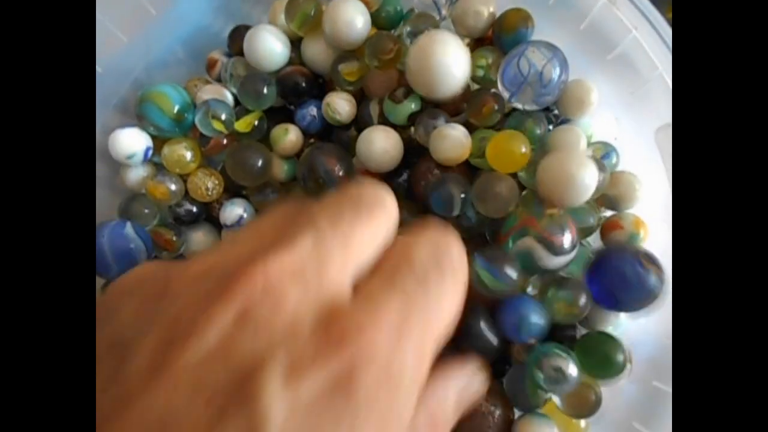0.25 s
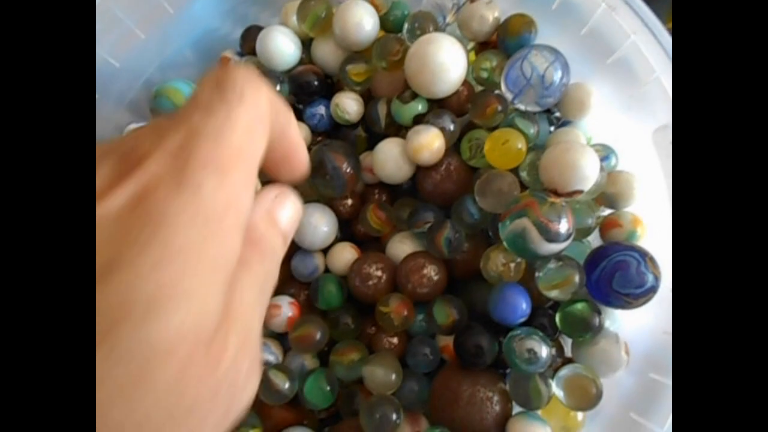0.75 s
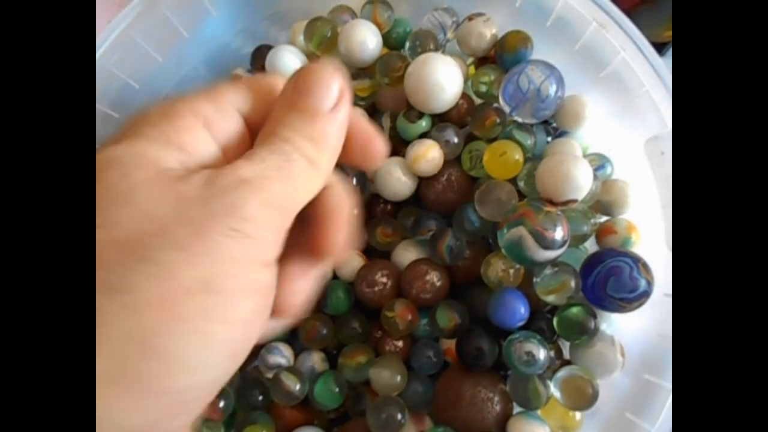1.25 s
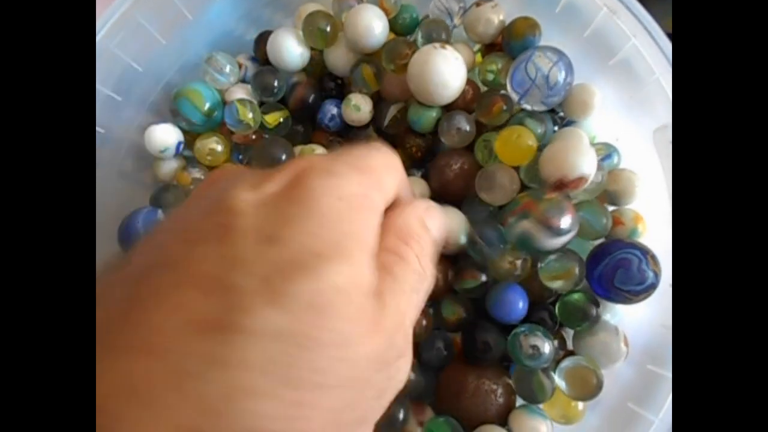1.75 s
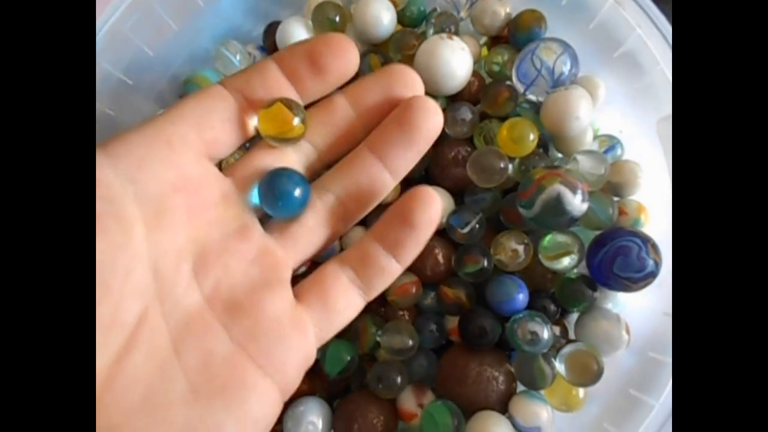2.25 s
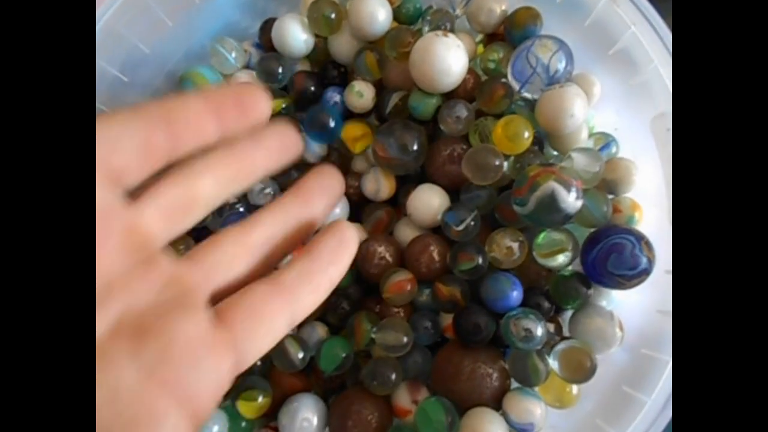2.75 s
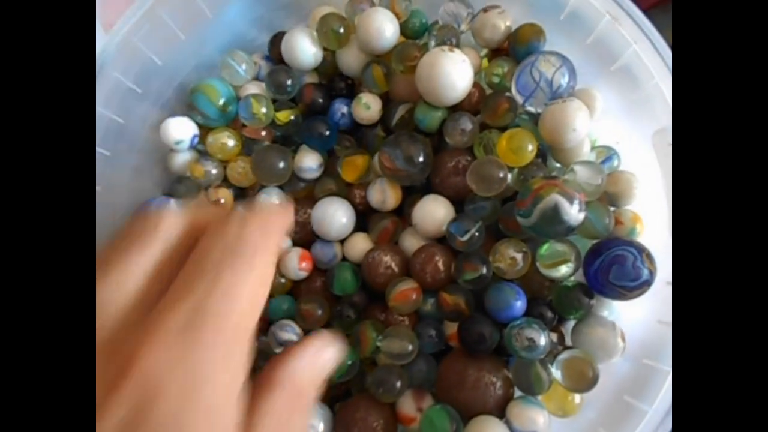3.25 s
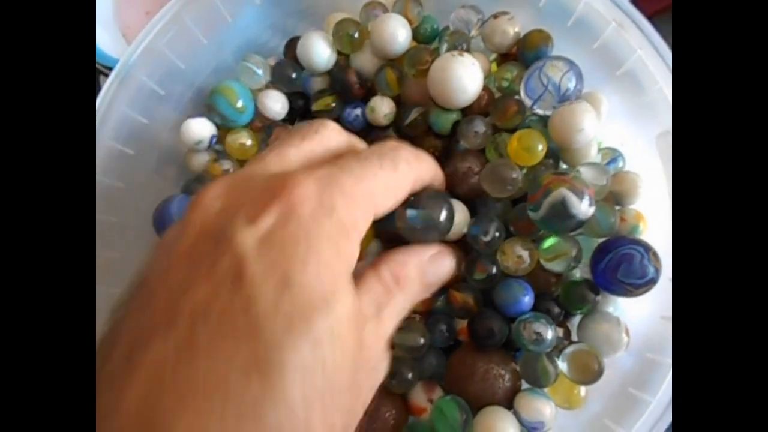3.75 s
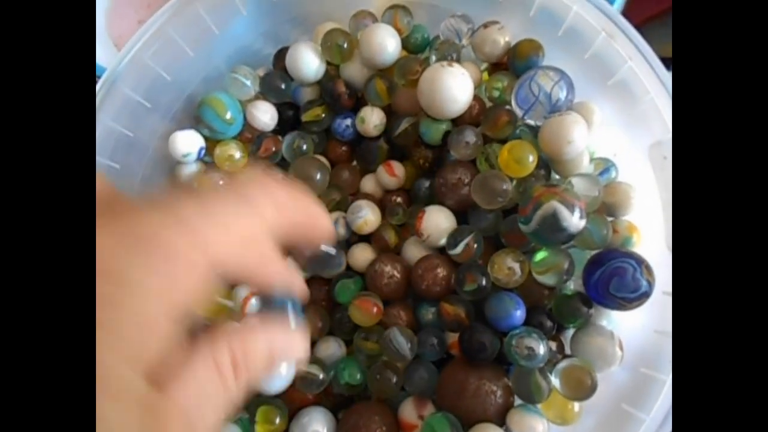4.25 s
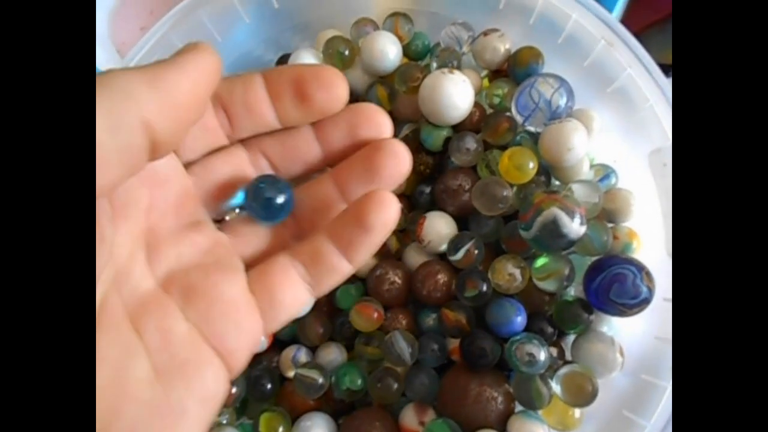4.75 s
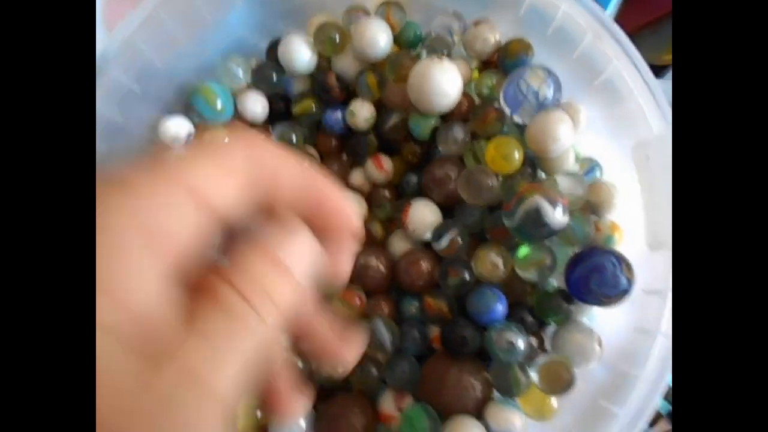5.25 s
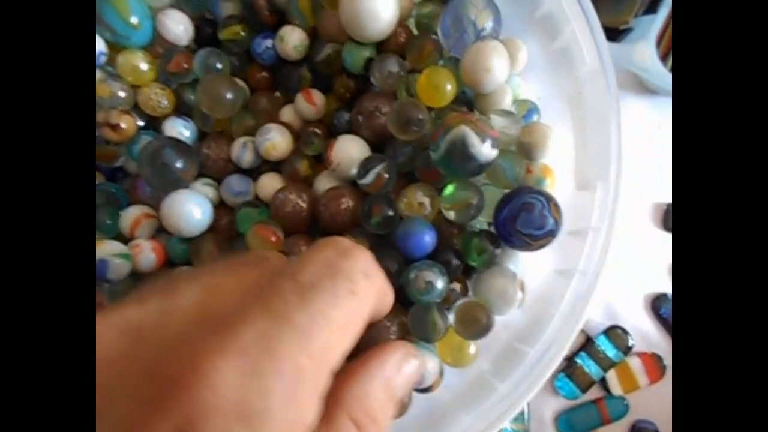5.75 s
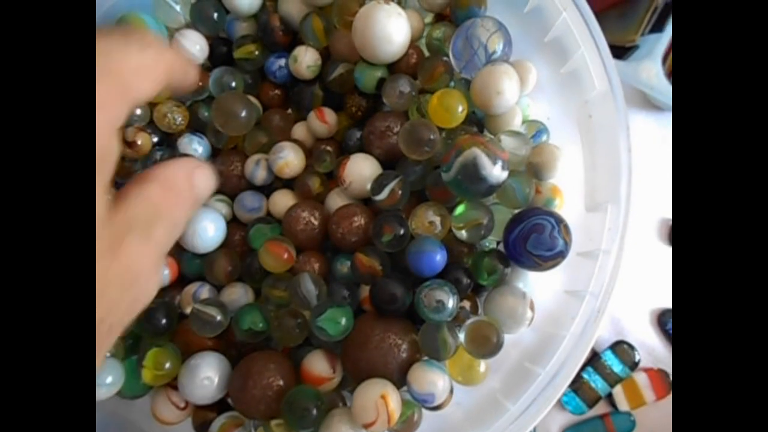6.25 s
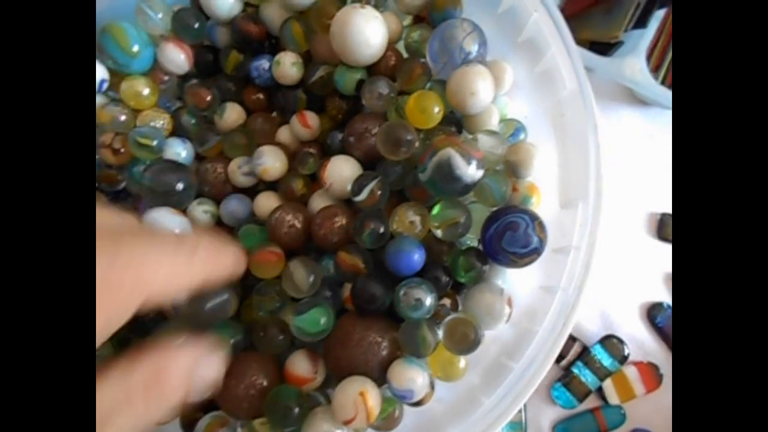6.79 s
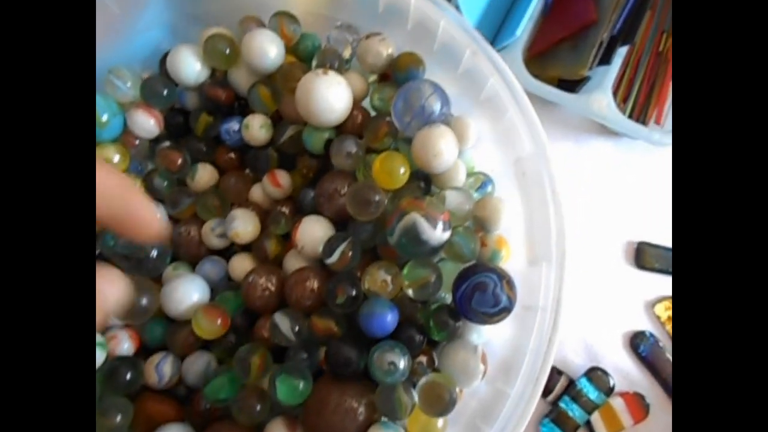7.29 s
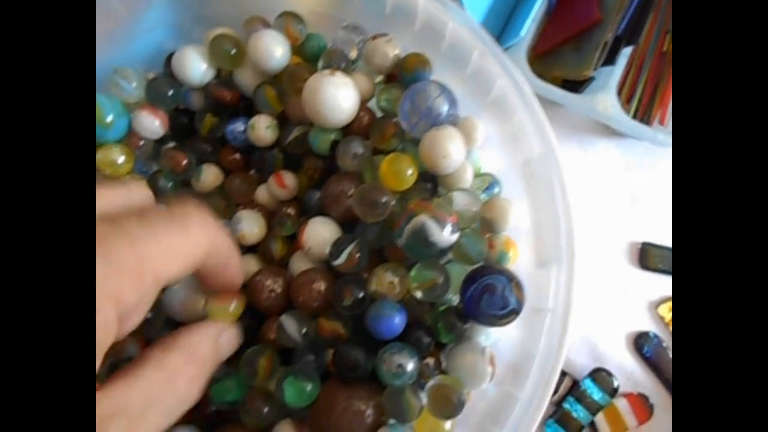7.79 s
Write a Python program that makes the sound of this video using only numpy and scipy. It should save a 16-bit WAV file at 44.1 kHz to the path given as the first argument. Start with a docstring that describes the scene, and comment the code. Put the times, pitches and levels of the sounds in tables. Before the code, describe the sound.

A hand rummages through a heap of glass marbles, bright clicks and hollow tub knocks coming in clusters, close up in a quiet room.

```python
"""Glassy clacks and small ticks crowd in together from the start over quiet room air: marbles stirred in a tub.
Each collision is a noise burst a few milliseconds long, coloured as glass, that sets the plastic tub ringing.
Small contacts are drawn at random, denser under a firm push; the clacks that stand out may land again.
Heavy blows excite modes of the bottom and wall, the arm brushes the rim as shaped friction noise,
and a faint diffuse tail and steady coloured noise make up the quiet room around the close microphone."""
import sys
import numpy as np
from scipy import signal
from scipy.fft import rfft, irfft
from scipy.io import wavfile
from scipy.ndimage import uniform_filter1d

SR = 44100
rng = np.random.default_rng(int(sys.argv[2]) if len(sys.argv) > 2 else 0)


def to_wav(s):
    """Save 16-bit WAV."""
    ch = np.atleast_2d(s).T  # columns
    pcm = np.round(np.clip(ch, -1, 1) * 32767)  # PCM
    wavfile.write(sys.argv[1], SR, pcm.astype(np.int16))


N = 353946  # samples

# ringing of the air in the tub, before any trim: [f/Hz, bandwidth/Hz, gain/dB]
HOLLOW = [(430, 42.6, 9), (848, 23, 1)]
# ringing of the plastic wall, before any trim: [f/Hz, bandwidth/Hz, gain/dB]
WALL = [(890, 100, -10.5), (1570, 35, -7), (2050, 27, -2.5), (2444, 200, -2)]


def gain_of(db):
    """Logarithmic level: 20 dB is a factor of ten in amplitude."""
    return 10 ** (np.asarray(db) / 20)


def evened(x):
    """Normalisation by effective value: scales a signal to an rms of 1."""
    return x / np.sqrt(np.mean(x ** 2))


def read(points, hz, axis=1):
    """Logarithmic frequency scale: joins one table column by straight lines over log frequency."""
    columns = np.transpose(points)
    return np.interp(np.log(hz + 1), np.log(columns[0] + 1), columns[axis])


def add(mix, s, sound):
    """Superposition: adds a sound to the mix in place from time s."""
    part = mix[max(round(s * SR), 0):][:len(sound)]
    part += sound[:len(part)]


def causal(db):
    """Minimum phase: the Hilbert transform of a log gain gives a filter that rings only after its input."""
    circle = np.concatenate([db, db[-2:0:-1]]) * np.log(10) / 20
    return np.conj(signal.hilbert(circle))[:len(db)]


def ring(x, modes):
    """Modal resonance: each damped mode is a one-pole complex resonator driven by x."""
    out = np.zeros(len(x))
    for hz, width, db in modes:
        decay = np.exp(-np.pi * width / SR)  # per sample; a wider mode dies sooner
        pole = decay * np.exp(2j * np.pi * hz / SR)
        out += 2 * gain_of(db) * signal.lfilter([1 - decay], [1, -pole], x).real
    return out


def noise(spectrum):
    """Spectral shaping: white noise takes on a given colour, at an rms of 1."""
    colour = gain_of(read(spectrum, np.fft.rfftfreq(N, 1 / SR)))
    return evened(irfft(rfft(rng.standard_normal(N)) * colour, N))


def stirring(s):
    """Forced motion with friction: the heap starts almost at once, holds and settles after each push."""
    # the fingers push into the heap: [start t/s, length/s, level of motion/dB]
    shoves = [(0, 0.068, -32), (0.123, 0.077, -30), (0.208, .1, -35.5), (0.351, 0.31, -37),
              (0.758, 0.38, -61.5), (1.169, 0.039, -42), (1.535, .025, -41), (1.643, 0.038, -35),
              (1.749, 0.078, -35.5), (1.849, 0.073, -45), (2.075, 0.043, -47.5), (2.74, .12, -47),
              (3.39, .14, -39.5), (3.544, 0.042, -29), (3.715, 0.093, -42), (3.948, 0.078, -38.5),
              (4.223, 0.064, -47), (4.38, 0.12, -44.5), (4.85, 0.0456, -59), (5.876, 0.024, -48.5),
              (5.948, 0.058, -45.5), (6.336, .02, -41), (6.44, 0.049, -31), (6.553, 0.038, -27),
              (6.621, 0.31, -40.5), (6.991, .21, -55), (7.592, 0.029, -50)]
    grip, settle = 1101, 258.5  # dB per s of onset before the push and of decay after it
    start, length, level_db = np.transpose(shoves)[:, :, None]
    before, after = np.maximum(start - s, 0), np.maximum(s - start - length, 0)
    return (level_db - grip * before - settle * after).max(0)


def jostle(per_s, offset_db, spread_db, crowded_db, thinning, brightness=0.072, variety=1.3):
    """Random point process: uneven small contacts crowd under a firm push and thin out under a light one."""
    slots = np.arange(int(N / SR * per_s))
    chance = rng.standard_normal((len(slots), 3))
    s = (slots + .3 * chance[:, 0]) / per_s
    stir_db = stirring(s)
    # at crowded_db and above every slot holds a contact
    touches = rng.random(len(s)) < gain_of(thinning * (stir_db - crowded_db))
    level_db = stir_db + offset_db + spread_db * chance[:, 1]
    bright = brightness + variety * chance[:, 2]  # dB per octave
    rows = np.column_stack([s, level_db, bright])
    # the heap holds still under the lightest touch
    return collisions(rows[touches & (stir_db > -66)])


def collisions(rows, late_db=-26, hardness=0.22, ripple=0.14, order=36, size=2048):
    """Multiple scattering: each contact builds and dies as a spray of echoes off neighbouring marbles."""
    # colour of an average collision: [f/Hz, relative level/dB]
    glass_colour = [(50, -42), (300, -16.5), (700, -9.5), (1150, -8), (1650, -4), (3200, -1.5), (5800, 2.5),
                    (8700, -0.5), (10200, -11.5), (11100, -40.5), (12100, -17.5), (13400, -33.5),
                    (14200, -46)]
    s, level_db, bright = np.transpose(rows)
    t, hz = np.arange(size // 2) / SR, np.fft.rfftfreq(size, 1 / SR)
    # bright contacts on top of the heap are over sooner than dull ones deep inside it
    age = t * np.exp(hardness * np.maximum(bright, -2)[:, None])
    rise, early, late = 1 - np.exp(-age / .0004), np.exp(-age / .0012), np.exp(-age / .007)
    shape = rise * (early + gain_of(late_db) * late)
    chance = rng.standard_normal((len(s), len(t) + order))
    spray = rfft(chance[:, order:] * shape, size)
    # the echoes comb the spectrum finely but leave its broad balance alone
    spray /= np.sqrt(uniform_filter1d(abs(spray) ** 2, size=70, axis=1))
    # a shorter contact tips the spectrum towards the treble
    octaves = np.log2(np.clip(hz, 1400, 8000))
    tilt = bright[:, None] * causal(octaves - octaves.mean())
    # the gaps around each marble favour pitches of their own
    gaps = ripple * rfft(chance[:, :order] * signal.windows.hann(order), size)
    colour = np.exp(causal(read(glass_colour, hz)) + tilt + gaps)
    clicks = irfft(spray * colour, size)[:, :len(t)]
    # level is the rms when all the energy is counted over 5 ms
    clicks /= np.sqrt((clicks ** 2).sum(1, keepdims=True) / (.005 * SR))
    out = np.zeros(N)
    for at, click in zip(s, clicks * gain_of(level_db)[:, None]):
        add(out, at, click)
    return out


def rebounds(count=3):
    """Inelastic impact: a struck marble that lands again does so more weakly and sooner each time."""
    # marble against marble, the clacks that stand out, before the scene's trim:
    # [t/s, level over 5 ms/dB, brightness/(dB per octave), time to first rebound/s or 0 if it stays put]
    clacks = [(0.0163, -25, 0, 0.019), (0.1197, -32, -1.5, 0.0017), (0.1507, -27, -2.5, 0.0028),
              (.186, -23.5, -0.5, 0), (0.4753, -30, 2.5, 0.03), (0.6203, -33, 2.5, 0.0037),
              (0.6548, -35.5, -5.5, 0.00033), (.774, -44.5, -0.5, 0.018), (.8254, -40.5, 0.5, 0),
              (0.8564, -35.5, 0.5, 0.00017), (0.9007, -43.5, 0.5, 0), (0.9427, -36, 0, 0.0092),
              (1.0487, -46, 2.5, 0), (1.0784, -44, -2, 0.026), (1.1683, -38, -6.5, 0.0014),
              (1.1813, -33.5, 1, 0), (1.2114, -27, -5.5, 0), (1.3032, -28.5, -4, 0.00011),
              (1.3936, -23, 1, .012), (1.483, -31, 0, 0.018), (1.5293, -23.5, -1, 0.019),
              (1.6426, -26, 0, 0.0012), (1.6595, -19, 0.5, .008), (1.7488, -26, 2.5, 0),
              (1.769, -28.5, -2, 0.034), (1.92, -37, -2.5, 0.00055), (1.973, -36, -1.5, 0.018),
              (2.029, -28.5, 0.5, 0.016), (2.0727, -24, -1.5, .01), (2.1034, -22.5, -3, 0.0013),
              (2.2299, -52.5, -3, 0.013), (2.4917, -30.5, 7, 0.0077), (2.58, -49.5, -5, 0),
              (2.7193, -31.5, 3.5, 0.0013), (2.7372, -19.5, -3, 0.0093), (2.82, -24.5, 0.5, 0.0057),
              (2.8559, -28, -.3, 0.0057), (2.9226, -47.5, -5, 0.0018), (3.1039, -47, -0.5, 0),
              (3.237, -53, -6, 0.0014), (3.4042, -27.5, 0, 0.00023), (3.454, -20.5, .5, .011),
              (3.5316, -26, 4, 0.013), (3.5717, -20.5, 1.5, 0.0012), (3.6044, -24.5, 2, 0.00072),
              (3.6623, -34, 0.5, 0.0076), (3.6986, -36, 0.5, 0.00018), (3.7166, -25.5, -0.5, 0.0022),
              (3.7554, -31.5, 4, 0.0019), (3.874, -36, 1, 0.017), (3.9166, -33.5, 2.5, 0.0015),
              (3.9629, -32.5, -1.5, 0), (4.0565, -26.5, -1.5, 0), (4.1232, -39.5, -2, 0),
              (4.1468, -34, -4.5, 0), (4.2112, -31.5, 1.5, 0.026), (4.2564, -30.5, 2, 0.011),
              (4.326, -36, 0.5, 0.0092), (4.37, -26, -2.5, 0.014), (4.42, -31, -1.5, .029),
              (4.5232, -39, -4, 0.032), (4.5754, -42.5, 0.5, 0.0065), (4.6039, -42.5, -6, 0),
              (4.7315, -45.5, -2.5, 0), (4.784, -46.5, -1, 0), (4.8334, -49, -6.5, 0.029),
              (5.7631, -36, 0.8, 0.011), (5.8709, -39, -4.5, 0.022), (5.9426, -31.5, 0, 0.027),
              (6.0426, -20.5, -.5, 0.014), (6.0908, -29.5, 5, 0.0017), (6.1436, -42, -1, 0.0014),
              (6.342, -28.5, -3, 0.0029), (6.4352, -28.5, -2.5, 0.015), (6.47, -29, -2.5, 0.00049),
              (6.5789, -17, -1.5, 0.007), (6.6207, -19.5, 0.5, 0.0074), (6.6835, -26, 1.8, 0.0062),
              (6.7207, -19.5, -1.5, 0.0061), (6.7849, -27, 2, 0.0014), (6.8617, -28.5, 0, 0),
              (6.9249, -30.5, 2.5, 0.0033), (7.0027, -36, 2, 0.019), (7.0561, -36, 1, 0.015),
              (7.0927, -35, 4, 0), (7.1235, -35.5, 5, .013), (7.1912, -32.5, -.5, 0.0056),
              (7.2217, -29, 0.5, .029), (7.2908, -48, -4, 0), (7.4972, -41, -3.2, .021),
              (7.7668, -39.5, -1.5, 0), (7.8586, -34, 0, 0.022), (8.0102, -28, 1.1, 0)]
    loss_db, gap_share = 5.5, 0.58  # loss at the first rebound; each gap as a share of the last
    rows = []
    for s, level_db, bright, gap in clacks:
        for k in range(count if gap > 0 else 1):
            rows.append((s, level_db - loss_db * k ** 2, bright))
            s += gap * gap_share ** k
    return collisions(rows)


def thumps(size=4096):
    """Impulse response: a heavy blow gives the bottom a short dull push and the wall a hollow knock."""
    # blows that reach the tub itself: [t/s, peak level of bottom push/dB, peak level of wall knock/dB]
    blows = [(0.154, -43, -45), (1.394, -58, -29), (1.663, -40.5, -45), (2.103, -45, -38),
             (2.737, -49, -28), (3.452, -50, -42), (3.57, -50, -27), (4.056, -42.5, -53),
             (6.041, -39.5, -35), (6.58, -44, -32), (6.723, -38.5, -28)]
    # give of the loaded plastic bottom: [f/Hz, bandwidth/Hz, relative gain/dB]
    bottom = [(151, 71, -3), (246, 160, 2)]
    out = np.zeros(N)
    impulse = signal.unit_impulse(size)
    push, knock = ring(impulse, bottom), ring(impulse, WALL)
    push, knock = push / push.max(), knock / knock.max()
    for s, push_db, wall_db in blows:
        add(out, s, gain_of(push_db) * push + gain_of(wall_db) * knock)
    return out


def brushes(grip_db=2.5, hollow_db=-1, wall_db=-4, size=130):
    """Stick-slip friction: skin grips and slips unevenly on the rim, and the tub colours the noise."""
    # the arm brushes the rim as it moves in and out: [start t/s, end t/s, level/dB]
    strokes = [(0.695, 1.451, -65), (1.484, 1.586, -47.5), (2.919, 3.063, -59.5), (3.213, 3.492, -52),
               (4.745, 5.75, -70.5), (5.4, 5.475, -68), (5.504, 6.299, -60.5), (6.322, 6.404, -48.5),
               (7.487, 7.921, -62.5), (7.87, 8.03, -50.5)]
    # skin sliding on plastic: [f/Hz, relative level/dB]
    skin = [(100, -23.5), (600, -19), (900, -1), (1800, -1), (4000, -6), (8500, -14), (11000, -40)]
    pressure = np.zeros(N)
    for start, end, db in strokes:
        length = max(int((end - start) * SR), 2)
        add(pressure, start, gain_of(db) * signal.windows.tukey(length, .7))
    colour = noise(skin)
    grip = evened(uniform_filter1d(rng.standard_normal(N), size))
    friction = colour * gain_of(grip_db * grip)
    hollow = gain_of(hollow_db) * ring(friction, HOLLOW)
    wall = gain_of(wall_db) * ring(friction, WALL)
    return pressure * evened(friction + hollow + wall)


def room(x, size=256):
    """Diffuse reverberation: decaying noise convolved with the sound leaves a tail whose treble dies first."""
    # reverberation of the room: [f/Hz, time to fall 60 dB/s, level/dB]
    reverberation = [(300, 0.84, -15), (1500, 0.48, -15.5), (9100, 0.07, -22.5)]
    hz, t, z = signal.stft(rng.standard_normal(SR // 2), SR, nperseg=size)
    t60 = read(reverberation, hz)[:, None]
    level_db = read(reverberation, hz, axis=2)[:, None]
    # the root keeps the tail's energy independent of its decay time
    z *= gain_of(level_db - 60 * t / t60) * np.sqrt(2 * np.log(1000) / (t60 * SR))
    tail = signal.istft(z, SR, nperseg=size)[1]
    return signal.fftconvolve(x, tail)[:N]


def scene(clack_db=-0.18, wall_db=-7, air_db=-67.5):
    """Linear superposition: marbles, ringing tub, room tail and still air sum at one microphone."""
    # still air of the room: [f/Hz, relative level per Hz/dB]
    air = [(25, -14), (120, -8.5), (450, -4), (1000, -2.5), (3000, -7), (7000, -12), (10000, -27),
           (11000, -35.5)]
    nudges = jostle(per_s=95, offset_db=1, spread_db=2.5, crowded_db=-45, thinning=.5)
    rolling = jostle(per_s=300, offset_db=-8.0, spread_db=3.0, crowded_db=-35.5, thinning=.8)
    glass = gain_of(clack_db) * rebounds() + nudges + rolling
    tub = ring(glass, HOLLOW) + gain_of(wall_db) * ring(glass, WALL)
    near = glass + tub + thumps() + brushes()
    return (near + room(near) + gain_of(air_db) * noise(air))[None]


def record(dry, size=511, edge_hz=14200):
    """Linear-phase filtering: a low-pass sets the band limit of the recorder."""
    lowpass = signal.firwin(size, edge_hz, window=("kaiser", 9), fs=SR)
    return signal.oaconvolve(dry, lowpass[None], "same")


dry = scene()
out = record(dry)
to_wav(out)
```